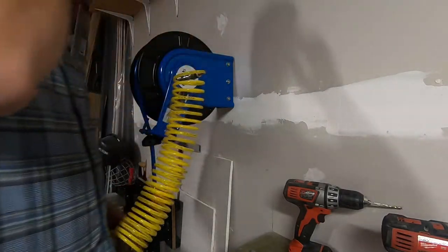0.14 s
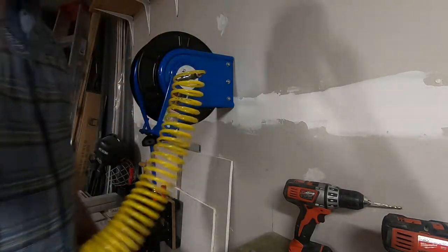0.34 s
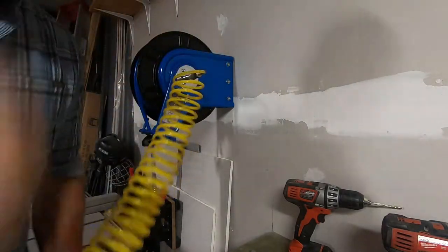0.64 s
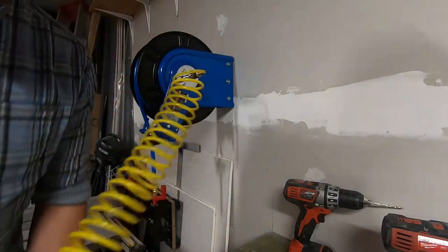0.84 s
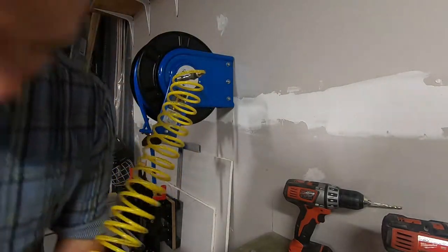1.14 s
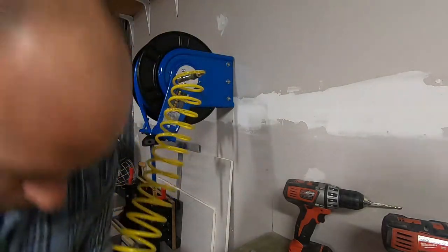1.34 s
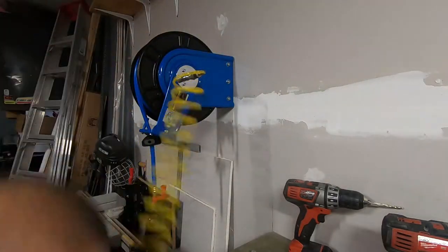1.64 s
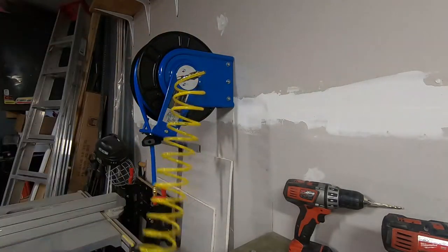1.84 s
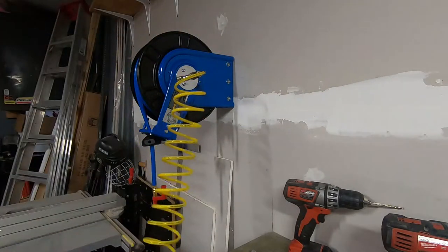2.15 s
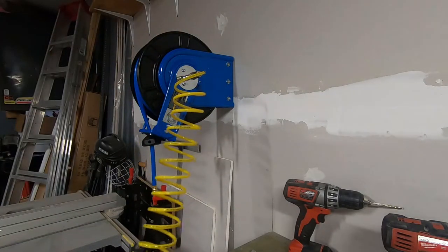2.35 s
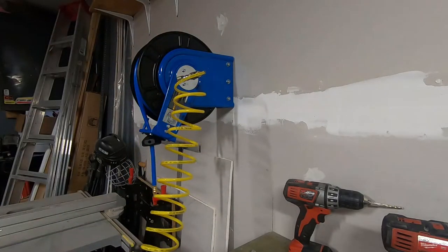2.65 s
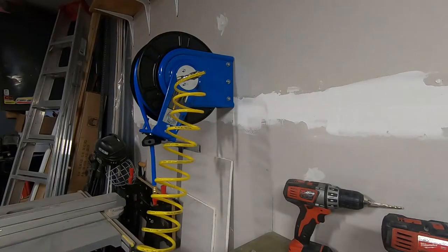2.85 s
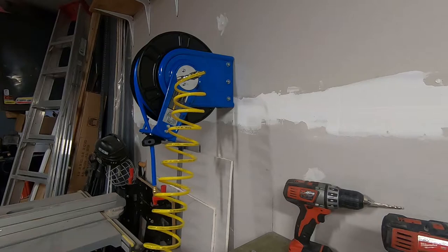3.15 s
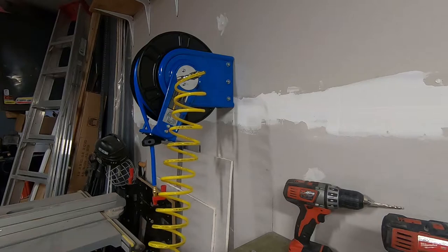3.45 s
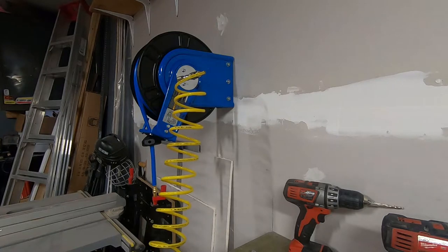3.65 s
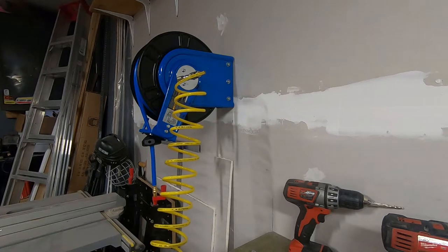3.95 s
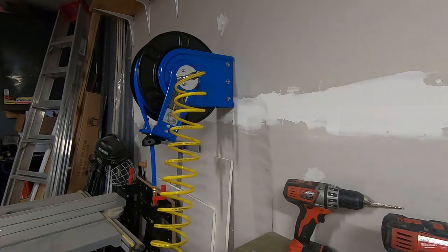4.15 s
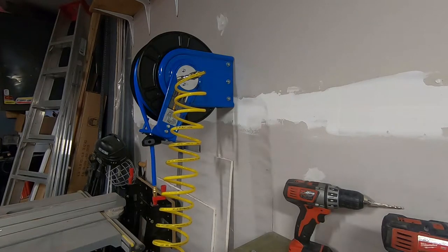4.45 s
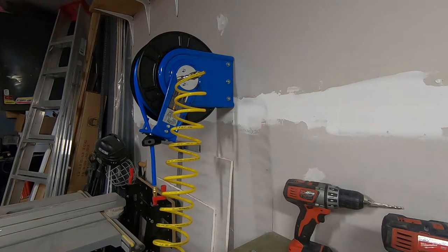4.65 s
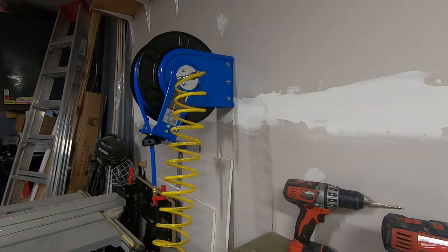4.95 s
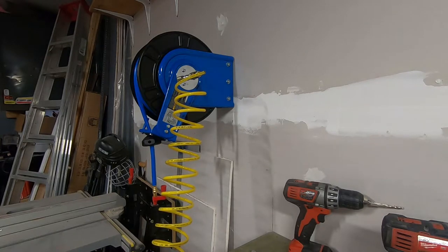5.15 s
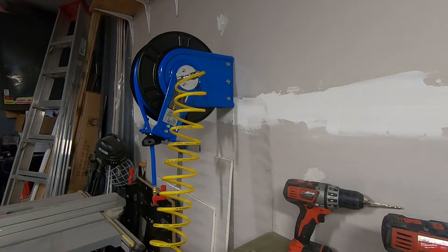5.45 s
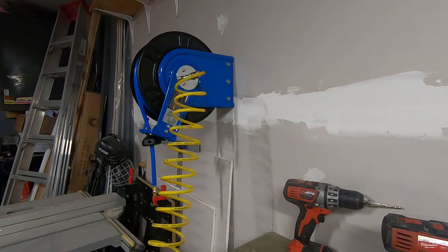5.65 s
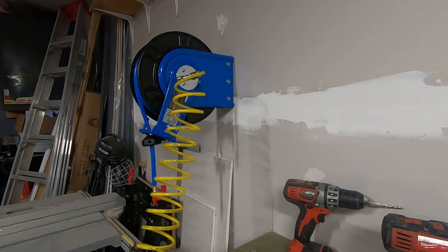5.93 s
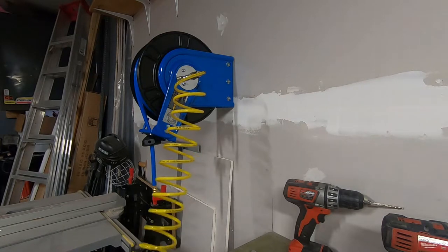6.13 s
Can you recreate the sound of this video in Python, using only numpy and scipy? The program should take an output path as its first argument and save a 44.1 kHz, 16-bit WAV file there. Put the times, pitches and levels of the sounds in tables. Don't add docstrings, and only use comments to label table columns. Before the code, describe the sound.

A quiet garage hum, handling thumps and brass coupling rattles, until a valve opens and air blasts out, screaming in a high steady whistle.

```python
import sys
import numpy as np
from scipy import signal
from scipy.io import wavfile
from scipy.ndimage import uniform_filter1d, minimum_filter1d

SR = 44100
rng = np.random.default_rng(int(sys.argv[2]) if len(sys.argv) > 2 else 0)


def wav_out(sig):
    wavfile.write(sys.argv[1], SR, np.round(np.clip(np.atleast_2d(sig).T, -1, 1) * 32767).astype(np.int16))


def volts_from_decibels(level):
    exponent = np.asarray(level, float) / 20
    return 10 ** exponent


N = 277389
TIME = np.arange(N) / SR


def curve(table, at=TIME, off=None):
    s, *columns = np.transpose(table)
    return [np.interp(at, s, c, off, off) for c in columns]


def over(table, hz):
    f, v = np.transpose(table)
    return np.interp(np.log(hz + 1), np.log(f + 1), v)


def smooth_twice(x, size):
    return uniform_filter1d(uniform_filter1d(x, size), size)


def walk(rate_hz):
    hold = int(SR / rate_hz)
    return 0.924 * smooth_twice(np.repeat(rng.standard_normal(N // hold + 1), hold), hold)[:N]


def butter(order, hz, kind, x):
    return signal.sosfilt(signal.butter(order, hz, kind, fs=SR, output="sos"), x)


def convolve(x, response):
    return signal.fftconvolve(x, response, axes=1)[:, :N]


def pan(x, left_minus_right_db):
    return x * volts_from_decibels(np.array([[left_minus_right_db / 2], [-left_minus_right_db / 2]]))


def add(out, s, x):
    i = int(s * SR)
    out[:, i:i + x.shape[-1]] += x[..., :N - i]


def ring(hz, t60_s, rise_s=0.00095, size=SR // 2):
    t = np.arange(size) / SR
    return np.sin(2 * np.pi * hz * t) * volts_from_decibels(-60 * t / t60_s) * (1 - np.exp(-t / rise_s))


def pipe(x, peaks):
    out = x
    for hz, width_hz, db in peaks:
        out = out + volts_from_decibels(db) * signal.lfilter(*signal.iirpeak(hz, hz / width_hz, SR), x)
    return out


def hiss(colour, alike, control, band_hz, patchy_db, grain_db=0., size=512):
    noise = rng.standard_normal((2, N)) * volts_from_decibels(grain_db * walk(900))
    hz, s, (mid, side) = signal.stft(noise / np.std(noise), SR, nperseg=size)
    share = np.clip(over(alike, hz), -.99, .99)[:, None]
    sign = np.array([1, -1])[:, None, None]
    ports = np.sqrt((1 + share) / 2) * mid + np.sqrt((1 - share) / 2) * side * sign
    bright = curve(control, s)[1] if len(control[0]) > 2 else 0 * s
    octaves = np.log2((hz[:, None] + 30) / np.sqrt(band_hz[0] * band_hz[1]))
    gain = volts_from_decibels(over(colour, hz)[:, None] + octaves * bright)
    in_band = (hz > band_hz[0]) & (hz < band_hz[1])
    gain = gain / np.sqrt((gain[in_band] ** 2).sum(axis=0) / len(hz))
    patches = uniform_filter1d(rng.standard_normal(gain.shape), size=12, axis=0)
    patches = uniform_filter1d(patches, size=6, axis=1)
    ports = ports * gain * volts_from_decibels(patchy_db * patches / np.std(patches))
    return signal.istft(ports, SR, nperseg=size)[1][:, :N] * volts_from_decibels(curve(control, off=-150)[0])


def strokes(rows):
    s = np.arange(0, N / SR, .002)[:, None]
    peak_s, db, rise_s, fall_s = np.transpose(rows)[:4]
    each_db = db - 20 * np.maximum((peak_s - s) / rise_s, (s - peak_s) / fall_s)
    power = volts_from_decibels(np.maximum(each_db, -200)) ** 2
    return s[:, 0], 10 * np.log10(power.sum(axis=1))


# (time [s], level [dB])
AIR = [
    (0, -66.5),
    (.8, -66),
    (1.1, -64),
    (1.9, -62.5),
    (2.199, -65.5),
    (4.4, -66.5),
    (4.7, -69),
    (6.3, -69.5),
]
# (frequency [Hz], level [dB])
AIR_COLOUR = [(15, -67), (36, -17), (76, -7.5), (183, -7.5), (300, -18.5), (555, -28.5), (800, -18),
              (3100, -35), (3900, -28), (4400, -22), (4700, -21.5), (4910, -16), (5200, -22), (5500, -33),
              (6000, -35), (7500, -36.5), (11000, -50), (15000, -82)]
# (frequency [Hz], likeness of ports [-1..1])
AIR_ALIKE = [(60, 0.65), (130, 0.86), (290, -0.089), (640, -0.58), (1410, -0.46), (3100, 0.92),
             (6820, -0.0056), (15000, -0.67)]


def air():
    return hiss(AIR_COLOUR, AIR_ALIKE, AIR, (4400, 5400), patchy_db=2.1, size=2048)


# (time [s], pitch [Hz], level [dB])
HUM = [(0.0, 130.2, -53), (0.26, 131.4, -48), (0.68, 131.3, -59), (0.96, 131.4, -50.5),
       (1.58, 130.4, -44.5), (2.84, 129.1, -54), (3.54, 127.0, -45), (4.61, 127.3, -44.5),
       (4.89, 126.0, -56), (5.69, 125.7, -64), (5.85, 125.7, -57), (6.2, 125.7, -63.5), (6.27, 125.8, -61),
       (6.29, 125.9, -64)]


def hum():
    hz, db = curve(HUM)
    phase = 2 * np.pi * np.cumsum(hz + 1.5 * walk(22.25)) / SR
    line = volts_from_decibels(db + 1.0 * walk(14)) * np.sin(phase)
    overtone = volts_from_decibels(db - 23.5 + 5.0 * walk(1.8)) * np.sin(2 * phase)
    return pan(np.sqrt(2) * (line + overtone), -1.1)


# (time [s], peak [dB], body [Hz], crack [dB], left minus right [dB])
KNOCKS = [(0.175, -63, 175, -59, 1.0), (0.809, -47, 160, -54, 0), (0.919, -31, 176, -71, 0),
          (1.239, -24, 433, -45, -1), (1.268, -33, 260, -49, -3), (1.3, -34, 242, -53, 2),
          (1.352, -36, 462, -52, 1), (1.438, -38.5, 680, -53, -13), (1.508, -30, 655, -46, -8),
          (1.515, -35, 640, -57, -11), (1.656, -36, 425, -49, -1), (1.745, -33, 590, -53, -0.5),
          (1.79, -36, 610, -56, 0), (1.953, -26.5, 600, -46, 4), (1.975, -30, 706, -54, 0),
          (1.997, -24, 806, -45, -4), (2.008, -29, 760, -50, 0), (2.066, -26, 610, -54, -0.5),
          (2.075, -26, 893, -48, 3), (2.099, -29, 794, -51, 5), (2.115, -28, 1145, -48, 2),
          (2.208, -37.5, 552, -33, -5), (3.364, -34, 207, -58, 1), (.83, -48.5, 322, -61, 0),
          (1.244, -26, 229, -44, -3), (1.381, -35.5, 270, -61, -2), (1.502, -32, 271, -60, 1),
          (2.237, -36, 215.6, -55, 1), (2.545, -43, 210, -74, 0), (2.87, -46.5, 456, -72, 0),
          (3.04, -53, 500, -62, 13), (3.124, -47, 353, -60, 1)]


def knocks():
    out = np.zeros((2, N))
    for s, db, hz, crack_db, pan_db in KNOCKS:
        crack = butter(3, [700, 3500], "band", rng.standard_normal(SR // 2) * ring(30.6, 0.11))
        body = ring(hz, 0.038, 0.00083) + 0.59 * ring(1.61 * hz, 0.03, 0.0015)
        add(out, s - .002, pan(volts_from_decibels(db) * body + volts_from_decibels(crack_db + 5.5) * crack, pan_db))
    return out


# (time [s], peak [dB], mode [Hz], t60 [s])
TAPS = [(0.178, -57, 1460, 0.051), (.808, -48, 1230, 0.03), (.808, -52, 474, 0.047),
        (1.431, -42.5, 3770, 0.044), (1.433, -47, 4400, .015), (1.434, -54, 6400, .02),
        (1.439, -42, 1800, .02), (1.449, -52, 4200, .015), (1.501, -50, 6500, 0.027),
        (1.503, -48, 3500, .02), (1.517, -48, 3530, .02), (0.176, -65, 1800, 0.027),
        (0.177, -57, 1270, .03), (.808, -61, 1900, 0.022), (.809, -59, 800, 0.025),
        (2.446, -37.5, 990, 0.071), (3.765, -44.5, 920, .2), (3.137, -43.5, 1600, 0.1),
        (2.9, -42, 2950, 0.047), (3.414, -44.5, 2950, 0.13), (4.64, -35, 1230, .06),
        (3.718, -51, 1300, .05), (1.503, -45.5, 2380, 0.038), (3.739, -35, 910, 0.036),
        (4.281, -41.5, 1276, 0.12), (2.622, -37, 1250, 0.11)]


def taps():
    out = np.zeros((2, N))
    for s, db, hz, t60_s in TAPS:
        add(out, s - .002, pan(volts_from_decibels(db + 1.5) * ring(hz, t60_s), -8.0))
    return out


# (peak time [s], level [dB], rise [s per 20 dB], fall [s per 20 dB], brightness [dB per octave])
DRAG = [
    (.87, -61.5, 0.093, 0.067, 3),
    (1.13, -48.5, 0.23, 0.69, 3),
    (1.436, -52, 0.018, .04, 1),
    (1.52, -58, 0.066, 0.23, 2.5),
    (1.776, -49, 0.44, 0.29, 0.9),
    (2.004, -38.5, 0.12, 0.16, 0.9),
    (2.094, -40, 0.15, 0.1, 0.25),
    (2.214, -42, 0.013, 0.017, -0.5),
    (2.25, -55, .05, 0.049, 2),
    (4.06, -70, .012, 0.17, 7.5),
]
# (frequency [Hz], level [dB])
DRAG_COLOUR = [(90, -18), (200, -6.5), (430, 2), (1040, -3), (1940, -8.5), (4000, -20), (7300, -25),
               (10500, -37), (12500, -53), (15000, -61)]
# (frequency [Hz], likeness of ports [-1..1])
DRAG_ALIKE = [(60, 0.7), (130, 0.94), (290, 1), (640, 0.87), (1410, 0.47), (3100, 0.7), (6820, 0.16),
              (15000, 0.06)]


def drag():
    s, db = strokes(DRAG)
    effort = np.transpose([s, db, curve(DRAG, s)[-1]])
    return hiss(DRAG_COLOUR, DRAG_ALIKE, effort, (1500, 6000), patchy_db=1.0, grain_db=3.2)


# (time [s], peak [dB], mode [Hz])
THUDS = [
    (1.244, -54, 102),
    (2.647, -72, 109),
    (3.148, -55, 26.9),
    (4.43, -56, 86),
    (4.639, -48.5, 99),
    (4.899, -59, 50.3),
    (5.019, -64, 37.4),
    (5.089, -49.5, 47),
]


def thuds():
    out = np.zeros((2, N))
    for s, db, hz in THUDS:
        add(out, s - .004, volts_from_decibels(db + 24.5) * ring(hz, 0.1, 0.0014) * np.array([[1], [.1]]))
    return out


# (time [s], peak [dB], middle modes [dB], top modes [dB], crack [dB])
CLINKS = [(2.444, -25.5, -14, -4, -20.5), (2.594, -27, -5.5, -5.5, -24.5), (2.621, -38, -7, -21, -34),
          (2.646, -42, -1, -17, -36), (2.76, -28, -6.5, -2.5, -28), (3.134, -31, -8, 3, -18.5),
          (3.168, -36.5, -8, -10, -27), (3.26, -39, -18, -27, -30), (3.325, -37.5, -0.5, 2, -20),
          (3.413, -31, -10.5, -7.5, -21), (3.548, -44.5, -11, -19, -40), (3.659, -45, -8, -13, -36),
          (3.718, -39.5, -6, -17, -33), (3.74, -33, -12, -17, -44), (4.070, -46, -6.5, -9, -28),
          (4.278, -33.5, -25, -14, -11)]
# (frequency [Hz], level [dB], t60 [s])
COUPLING = [(949, -5.5, 0.19), (1252, 5.5, 0.077), (1301, -3, 0.11), (1388, -4, 0.12), (1780, -5, 0.069),
            (1950, 8, 0.039), (2012, 12.5, 0.053), (2188, 11.5, 0.042), (2230, 9.5, 0.048),
            (2420, 11, 0.044), (2885, 11, 0.035), (2938, 10, 0.069), (3034, 0.5, 0.046), (3900, 3, 0.033)]
HARD_DB, SOFT_DB_PER_DB = -33, 1.1


def clinks():
    out, t, size = np.zeros((2, N)), np.arange(SR // 5) / SR, SR // 4
    for s, db, middle_db, top_db, crack_db in CLINKS:
        body = np.zeros(size)
        for hz, mode_db, t60_s in COUPLING:
            level_chance, pitch_chance = rng.standard_normal(2)
            group_db = top_db if hz > 2700 else middle_db if hz > 1600 else 0
            waver = uniform_filter1d(rng.standard_normal(size), size=64) * 8
            mode = (1.07 + 0.53 * waver) * ring(hz * (1 + 0.0051 * pitch_chance), t60_s, size=size)
            body += volts_from_decibels(mode_db + 0.5 * level_chance + group_db) * mode
        soft = volts_from_decibels(np.clip(SOFT_DB_PER_DB * (HARD_DB - db), 0, 14))
        ticks = rng.standard_normal(len(t)) * np.exp(-t / 0.0048 / soft) * (1 - np.exp(-t / 0.0035 / soft))
        ticks[SR // 160] += 9.0 / soft
        blow = signal.fftconvolve(ticks, body)
        blow = blow / np.abs(blow).max()
        scrape = .5 * rng.standard_normal(len(t)) * np.exp(-t / 0.031)
        blow[:len(t)] += volts_from_decibels(crack_db + 10.5) * butter(2, [800, 5500], "band", ticks + scrape)
        add(out, s - .007, pan(volts_from_decibels(db) * blow, -9))
    return volts_from_decibels(-2.5) * butter(4, 7000, "low", out)


# (time [s], peak [dB], mode [Hz], t60 [s])
TANK = [
    (3.216, -32.5, 367, 0.3),
]
TANK_DAMPED_S = 0.093


def tank():
    out = np.zeros((2, N))
    damped = np.exp(-(TIME[:SR // 2] / TANK_DAMPED_S) ** 4)
    for s, db, hz, t60_s in TANK:
        add(out, s, pan(volts_from_decibels(db + 6.5) * ring(hz, t60_s, 0.012) * damped, -1.5))
    return out


def nozzle_walls():
    t = TIME[:900]
    ridges = rng.standard_normal((1, 900)) * volts_from_decibels(-60 * t / .03) * .007 + (t == 0)
    return ridges / np.linalg.norm(ridges)


# (time [s], level [dB], brightness [dB per octave])
BURST = [
    (4.41, -117, 7),
    (4.422, -47, -1.5),
    (4.435, -34.5, 2.5),
    (4.507, -28.5, 1.5),
    (4.636, -33, 2),
    (4.66, -45.5, -1.5),
    (4.69, -56, -3),
    (4.74, -67, -4),
]
# (frequency [Hz], level [dB])
BURST_COLOUR = [(88, -33), (150, -6.5), (285, -16), (490, -9.5), (631, -15.5), (828, -7), (1540, -5),
                (1760, -1.5), (2200, -8.5), (3040, -3), (4060, -7), (4480, -4.5), (7000, -1.5),
                (10500, -10.5), (15500, -29)]
# (frequency [Hz], likeness of ports [-1..1])
BURST_ALIKE = [(60, 0.94), (130, 0.89), (290, 1), (640, 0.76), (1410, 0.43), (3100, 0.7), (6820, 0.038),
               (15000, 0.065)]
# (frequency [Hz], width [Hz], level over hiss [dB])
BURST_PIPE = [(1250, 130, -8), (1800, 140, -5), (3010, 52, -7), (3590, 80, 3.5), (4450, 93, -4),
              (5200, 63, 0), (6350, 89, -14), (6700, 60, -2), (7200, 140, -1.5), (8540, 110, 3),
              (10200, 180, -5)]


def burst(walls):
    air_rush = hiss(BURST_COLOUR, BURST_ALIKE, BURST, (7600, 9000), patchy_db=1.2, grain_db=2.0)
    return convolve(pipe(air_rush, BURST_PIPE) * volts_from_decibels(-1.5), walls)


# (peak time [s], level [dB])
BUFFET = [(4.615, -37.5), (4.895, -58), (5.014, -40.5), (5.09, -44.5), (5.16, -43.5), (5.3, -45),
          (5.38, -40.5), (5.532, -51), (5.67, -52), (5.818, -41.5), (5.87, -45), (5.969, -42.5),
          (6.07, -46.5), (6.29, -46.5)]
# (frequency [Hz], density [dB per Hz])
BUFFET_COLOUR = [(15, -2.5), (40, -3), (90, -7), (200, -21), (500, -34), (2000, -79)]
PUFF_RISE_S, PUFF_FALL_S = 0.14, 0.13


def buffet():
    puffs = np.transpose(strokes([(s, db, PUFF_RISE_S, PUFF_FALL_S) for s, db in BUFFET]))
    rumble = hiss(BUFFET_COLOUR, [(20, -.1), (500, .2)], puffs, (20, 110), patchy_db=1.2, size=2048)
    return pan(rumble * volts_from_decibels(1.0 * walk(35) - 4), 4.9)


# (time [s], level [dB])
JET = [(4.62, -45), (4.73, -43.5), (4.775, -37.5), (4.81, -38), (4.866, -35.5), (4.93, -40), (5.15, -39.5),
       (5.35, -40.5), (5.44, -37), (5.55, -37.5), (5.64, -36), (5.68, -37.5), (5.715, -37.5), (5.8, -40),
       (6.0, -41), (6.15, -39.5), (6.29, -37.5)]
# (frequency [Hz], level [dB])
JET_COLOUR = [(150, -20), (350, -27.5), (960, -17.5), (1450, -15.5), (2400, -9.5), (3000, -3), (4200, -4),
              (4480, -6), (5300, -4.5), (6200, -2.5), (6480, -5), (6700, -3), (7150, -4.5), (7400, -4.5),
              (7900, -7.5), (10000, -13), (11300, -17), (13300, -20), (13900, -22), (14250, -90)]
# (frequency [Hz], likeness of ports [-1..1])
JET_ALIKE = [(60, -0.08), (130, -0.93), (290, 0.69), (640, 0.64), (1410, 0.65), (3100, 0.87), (6820, 0.56),
             (15000, -0.35)]
# (frequency [Hz], width [Hz], level over hiss [dB])
JET_PIPE = [(970, 19, 0.5), (2000, 270, -2.5), (2933, 43, 2), (3327, 30, 4), (3656, 41, 3), (3856, 32, 4.5),
            (3925, 56, -1.5), (4110, 49, -4), (4710, 33, 5), (4910, 94, 0), (5210, 97, 2), (5570, 44, -4),
            (5780, 50, 7.5), (6080, 64, 3.5), (6270, 45, -1), (7260, 170, 1.5), (10050, 330, 1)]


def jet(walls):
    flow = hiss(JET_COLOUR, JET_ALIKE, JET, (2200, 3400), patchy_db=1.0, grain_db=1.2)
    return convolve(pipe(flow, JET_PIPE) * volts_from_decibels(-2.0), walls)


# (time [s], pitch [Hz])
PITCH = [
    (4.63, 3680),
    (4.642, 3820),
    (4.651, 4110),
    (4.688, 4390),
    (4.698, 4640),
    (4.713, 4900),
    (4.738, 5190),
    (4.752, 5500),
    (4.845, 6165),
]
# (time [s], added pitch [Hz])
CREEP = [
    (5.0, 0),
    (5.15, -18),
    (5.3, -17),
    (5.5, 5),
    (5.7, 9),
    (5.75, -1),
    (6.15, 2),
    (6.29, -8),
]
# (time [s], left [dB], right [dB], half width [s])
NULLS = [(4.646, 11.5, 9, 0.0042), (4.652, -9, -8, 0.0014), (4.693, -10, -10, .0015),
         (4.722, -19, -14, 0.0018), (4.731, -12, -12, .002), (4.812, -8, -8, .002), (4.828, -8, -7.5, .002),
         (4.668, 2, 5, 0.014), (4.679, 4.5, -7, 0.0034), (4.7, -10, -12, 0.0067), (4.715, 4.5, 2, .01),
         (4.735, -6, -1, .01), (4.756, -10, -17, 0.019), (4.78, 0.5, 6, 0.011), (4.805, -15, 3, 0.0035),
         (4.822, -5, -10.5, 0.024), (4.841, -7, 6, .004), (4.866, -14, -4, 0.011), (4.873, -9, -14, 0.0034),
         (4.892, 6, -1.5, 0.02), (4.915, -22, -3, 0.009), (4.933, -4, -21, 0.0085), (4.945, -13, 4, 0.0028),
         (4.965, -3, -8, 0.022), (4.989, 3, -9, 0.0063), (5.011, -17, -14, 0.0025),
         (5.023, -3, -18, 0.0052), (5.04, -14, -7, 0.011), (5.065, -13, -3, 0.0071),
         (5.094, -8, -4, 0.0033), (5.102, 0.5, -10, 0.0064), (5.112, -5, -4, .004), (5.145, -1.5, -5, 0.02),
         (5.174, -7.5, 5.5, 0.013), (5.185, 2.5, -12, .006), (5.2, 1.5, -5.5, 0.046), (5.26, -6, -2, 0.011),
         (5.33, -11, -1.5, 0.0088), (5.418, -2.5, -9.5, 0.041), (5.5, -9, -4, 0.017),
         (5.58, -8, -3.5, 0.055), (5.632, -16, -15, 0.015), (5.69, -6, -3, 0.0092),
         (5.735, -6.5, -3.5, 0.051), (5.854, 0.5, -23, 0.022), (5.94, -1, -3, 0.051),
         (6.1, -25, 1.5, 0.024), (6.164, -15, 0, 0.015), (6.25, -4, -5, 0.096)]
# (from [s], to [s])
OPPOSED = [(4.93, 4.95), (5.04, 5.258), (5.415, 5.44), (6.165, 6.4)]
WHISTLE_S, WHISTLE_RISE_S, WHISTLE_DB = 4.63, .034, (-14.5, -13)
TOP_HZ, SETTLE_S, SEAT_S, SAG_HZ_PER_S = 6846, .18, .29, 25
LEAD_RAD, OPPOSED_LEAD_RAD = -0.73, -2.7


def whistle_controls():
    jump_s, jump_hz = PITCH[-1]
    since = np.maximum(TIME - jump_s, 0)
    climb = 1 - np.exp(-since / SETTLE_S - (since / SEAT_S) ** 2)
    hz = curve(PITCH)[0] + (TOP_HZ - jump_hz) * climb - SAG_HZ_PER_S * since + curve(CREEP)[0]
    db = np.array(WHISTLE_DB)[:, None] - 24 * np.clip(1 - (TIME - WHISTLE_S) / WHISTLE_RISE_S, 0, 1)
    for s, left_db, right_db, width_s in NULLS:
        db = db + np.array([[left_db], [right_db]]) * np.exp(-((TIME - s) / width_s) ** 2)
    db = db + 2.4 * np.exp(-(since / .2) ** 2) * np.array([walk(260), walk(260)])
    opposed = sum(1. * (TIME > a) * (TIME < b) for a, b in OPPOSED)
    opposed = uniform_filter1d(opposed, size=350)
    return hz, db, LEAD_RAD + (OPPOSED_LEAD_RAD - LEAD_RAD) * opposed + 0.087 * walk(14)


# (offset above tone [Hz], level [dB])
IMAGES = [
    (3900, -38),
    (7800, -52),
]
OCTAVE_DB = (-31.5, -36.5)
FOLD_HZ, FOLD_DB = 24000, -32
SKIRT_DB, SKIRT_ABOVE_HZ, SKIRT_WIDTH_HZ = -13, 55, 46
GLIDE_ECHO_DB, GLIDE_ECHO_S = -9, .09


def whistle():
    hz, db, lead = whistle_controls()
    jitter_hz = 2.0 * walk(29.86) + 5.0 * uniform_filter1d(walk(500), size=30)
    phase = 2 * np.pi * np.cumsum(hz + jitter_hz) / SR + np.array([lead, -lead]) / 2
    on = TIME > WHISTLE_S
    gain = np.sqrt(2) * volts_from_decibels(db + .7 * np.array([walk(45), walk(45)])) * on

    eddies = butter(1, SKIRT_WIDTH_HZ, "low", rng.standard_normal((2, 2, N)))
    eddies = butter(5, 450, "low", eddies)
    eddies = (eddies[0] + 1j * eddies[1]) / np.std(eddies) * np.exp(2j * np.pi * SKIRT_ABOVE_HZ * TIME)
    skirt = volts_from_decibels(SKIRT_DB - 14.5) * np.imag(eddies * np.exp(1j * phase)) * on

    octave = np.imag((1 + .3 * eddies) * np.exp(2j * phase))
    octave = octave * volts_from_decibels(np.array(OCTAVE_DB)[:, None] + 2.09 * walk(20))
    octave = octave * (TOP_HZ / hz) ** 2 * np.clip((hz - 4350) / 300, .2, 1)

    copies = volts_from_decibels(FOLD_DB) * np.sin(2 * np.pi * FOLD_HZ * TIME - 2 * phase) * (np.abs(hz - 5700) < 350)
    for above_hz, image_db in IMAGES:
        copies = copies + volts_from_decibels(image_db) * np.sin(phase + 2 * np.pi * above_hz * TIME) * (hz > 6600)

    t = TIME[:2600]
    near = rng.standard_normal((2, 2600)) * volts_from_decibels(-60 * t / (2 * GLIDE_ECHO_S)) * (t > .004)
    climbing = gain.mean(axis=0) * np.sin(phase[0]) * np.clip((TOP_HZ - 70 - hz) / 300, 0, 1)
    echoes = volts_from_decibels(GLIDE_ECHO_DB) * convolve(climbing[None], near / np.linalg.norm(near[0]))
    return gain * (np.sin(phase) + octave + copies) + skirt + echoes


ROOM_T60_S, ROOM_TREBLE_T60_S, ROOM_ALIKE = 0.57, 0.36, 0.57


def room(x):
    t = np.arange(SR * 3 // 4) / SR
    mid, side = rng.standard_normal((2, len(t)))
    noise = np.sqrt(1 + ROOM_ALIKE) * mid + np.sqrt(1 - ROOM_ALIKE) * side * np.array([[1], [-1]])
    low = butter(1, 2500, "low", noise)
    tail = low * volts_from_decibels(-60 * t / ROOM_T60_S) + (noise - low) * volts_from_decibels(-60 * t / ROOM_TREBLE_T60_S)
    tail = tail * np.clip(t / 0.014, 0, 1)
    return convolve(x.mean(axis=0)[None], tail / np.sqrt((tail ** 2).sum() / 2))


def scene():
    walls = nozzle_walls()
    hits, metal, drum, blast, tone = knocks(), clinks(), tank(), burst(walls), whistle()
    wet = room(volts_from_decibels(-4.5) * hits + metal + volts_from_decibels(-13.5) * drum + volts_from_decibels(-4.5) * blast + volts_from_decibels(-12.5) * tone)
    hose = hits + taps() + drag() + thuds() + metal
    return air() + hum() + hose + drum + blast + buffet() + jet(walls) + tone + wet


def roll_off(x):
    return signal.sosfilt(signal.butter(12, 15660, fs=SR, output="sos"), x)


LIMIT_DB, LIMIT_S = -7, 0.008


def record(dry):
    dry = signal.sosfilt(signal.ellip(8, .1, 60, 15660, fs=SR, output="sos"), dry)
    span = int(LIMIT_S * SR) + 1
    peak = np.abs(dry).max(axis=0) + 1e-9
    gain = minimum_filter1d(np.minimum(1, volts_from_decibels(LIMIT_DB) / peak) ** 0.8, size=span)
    return roll_off(dry * smooth_twice(gain, span // 2))


dry = scene()
out = record(dry)
wav_out(out)
```